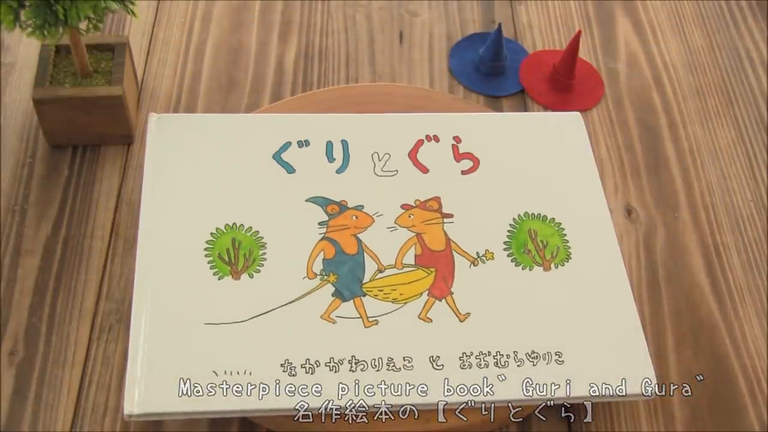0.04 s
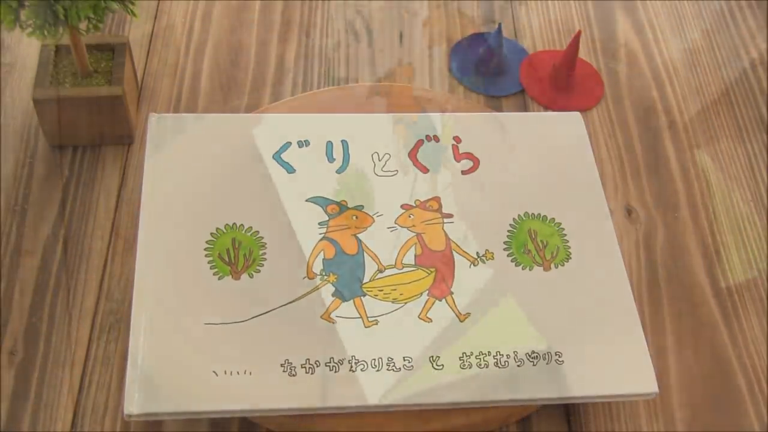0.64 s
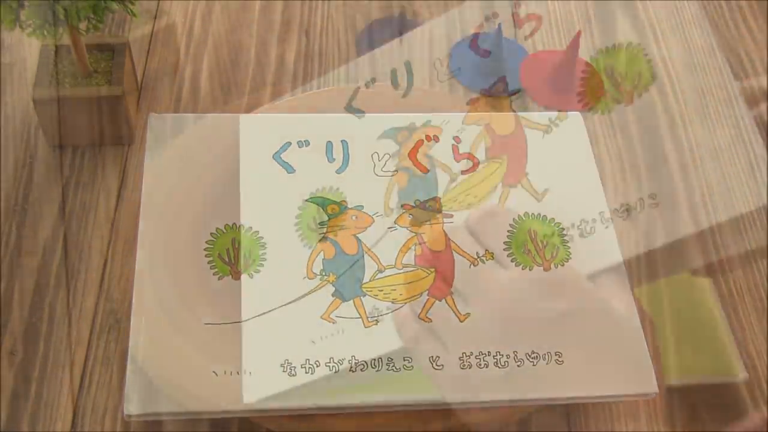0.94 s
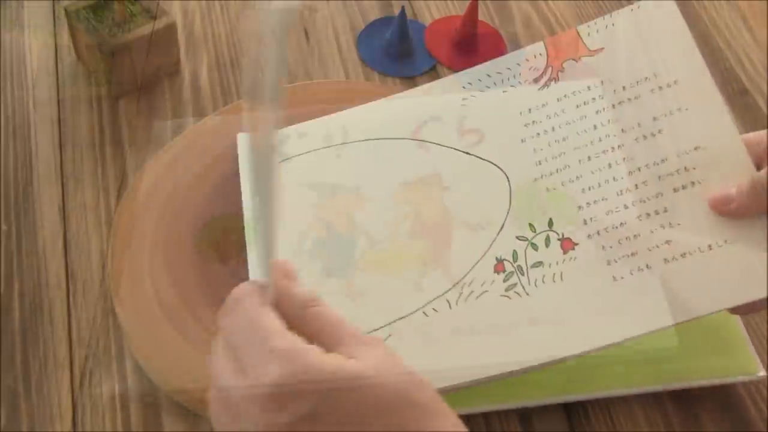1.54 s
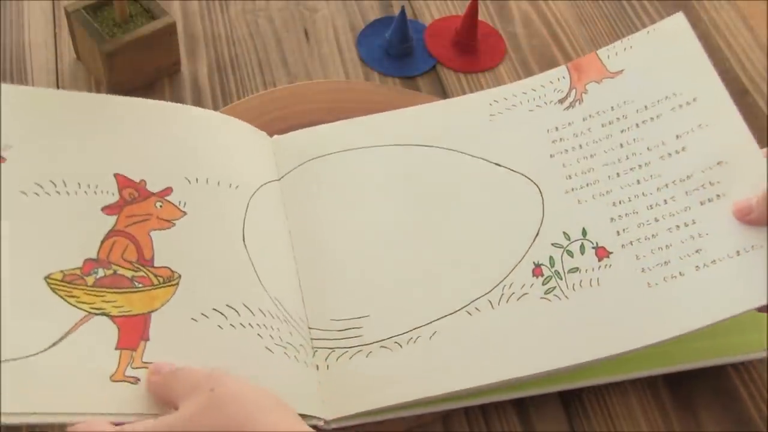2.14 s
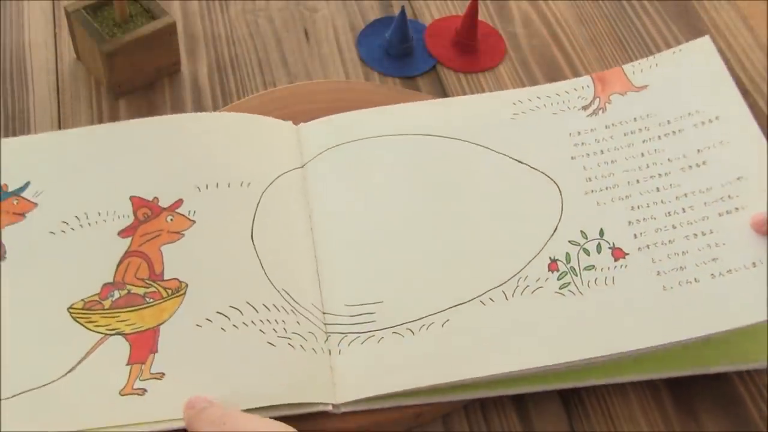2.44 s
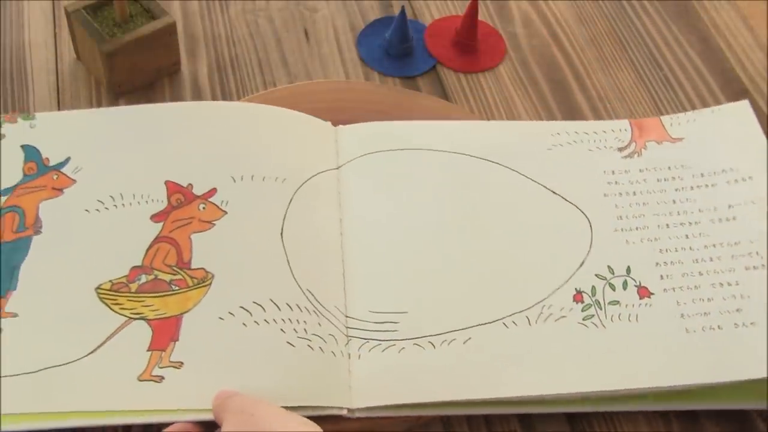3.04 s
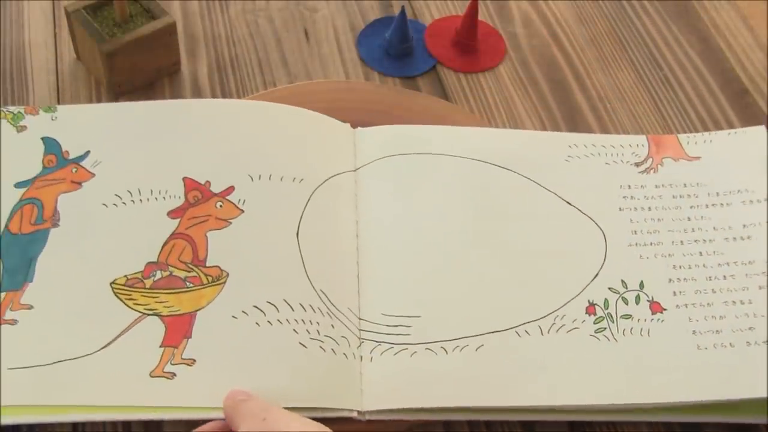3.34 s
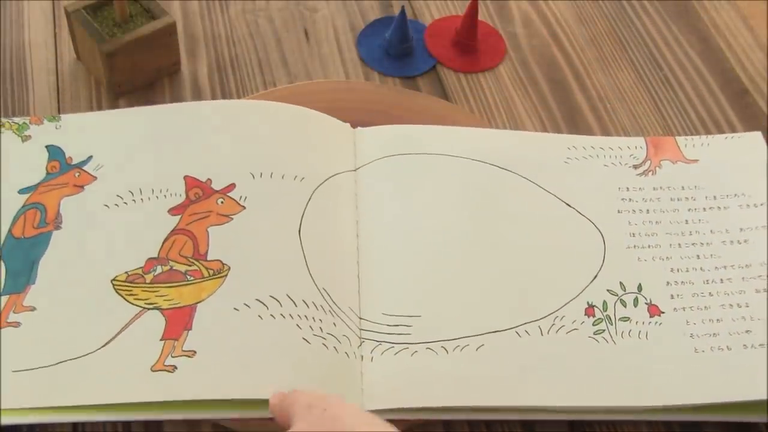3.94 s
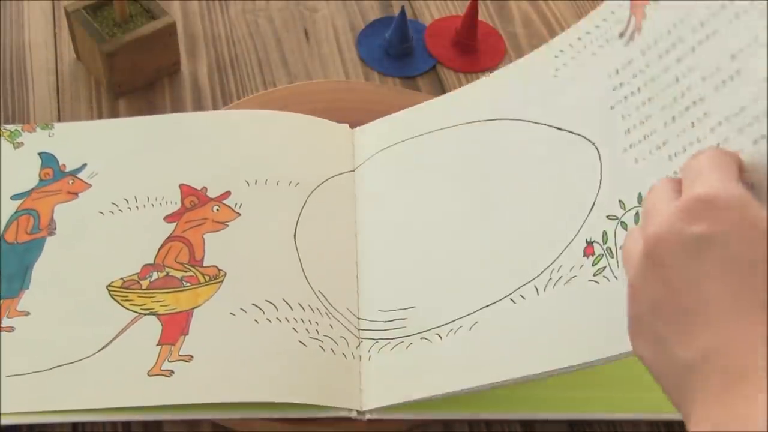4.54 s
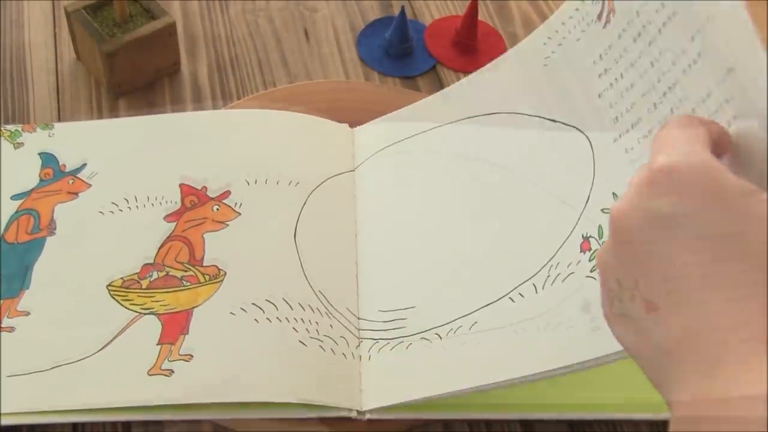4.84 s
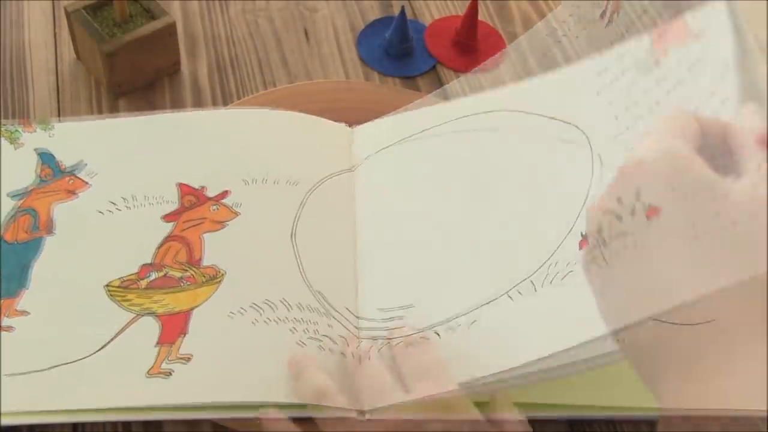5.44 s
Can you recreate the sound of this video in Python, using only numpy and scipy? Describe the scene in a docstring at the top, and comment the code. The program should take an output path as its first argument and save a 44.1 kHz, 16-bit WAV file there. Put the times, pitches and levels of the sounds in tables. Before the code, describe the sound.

In a quiet room, a fingertip rubs briefly on the cover of a large hardcover book. The cover swings open with a soft sliding hiss and small ticks of paper edges, then knocks down on a wooden table and rocks gently. After a short lull, a stiff page is lifted, rustling and buckling with several sharp snaps. The microphone is close.

```python
"""A quiet room, close stereo microphone at a wooden table: a large hardcover picture book is opened.
A fingertip sticks and slips on the cover, boards and sheets slide with a grainy hiss, paper edges tick.
The cover knocks down, rings briefly and rocks; the pages settle, then the next stiff sheet is lifted
and buckles with sharp snaps. Behind it are a short room tail, still air and a faint mains hum."""
import sys
import numpy as np
from scipy import signal
from scipy.fft import rfft, irfft, next_fast_len
from scipy.io import wavfile
from scipy.ndimage import uniform_filter1d

SR = 44100
rng = np.random.default_rng(int(sys.argv[2]) if len(sys.argv) > 2 else 0)


def generate_wav(sig):
    """Save sig (samples, or channels by samples) to the path in sys.argv[1] as 16-bit PCM at SR."""
    pcm = np.round(np.clip(np.atleast_2d(sig).T, -1, 1) * 32767).astype(np.int16)
    wavfile.write(sys.argv[1], SR, pcm)


N = 246078
TIME = np.arange(N) / SR

# the cover lands and bounces: t/s, level/dB
LANDINGS = [(2.529, -12.5), (2.565, -36), (2.605, -26), (2.6086, -29.5)]
# the stiff sheet buckles: t/s, level/dB, f/Hz of the buckled patch, decay/s
BUCKLES = [(4.391, -37.5, 1540, .002), (4.7956, -22, 2240, 0.00051), (4.7974, -26.5, 970, 0.0036),
           (4.948, -29.5, 2120, 0.0017), (5.106, -28, 1380, 0.0027), (5.2365, -20, 2690, 0.0014),
           (5.243, -22, 2240, 0.0026), (5.3443, -32.5, 1210, 0.0016), (5.348, -26.5, 1630, 0.0065),
           (5.477, -27.5, 2200, .0008), (5.492, -35, 2330, 0.00095), (5.506, -24, 2300, .001),
           (5.551, -23, 1980, .002)]
# clear ticks of paper edges and spine: t/s, level/dB, centre f/Hz, time scale/s
EDGE_TICKS = [(0.342, -30.5, 3400, 0.0024), (0.381, -31.5, 3900, 0.00058), (0.403, -31, 3300, 0.0028),
              (0.418, -27.5, 3670, 0.0016), (0.426, -26, 3500, 0.00049), (.4654, -29, 3700, 0.0027),
              (0.494, -34, 3500, .0036), (.506, -25.5, 3100, 0.0013), (1.8965, -25.5, 4230, 0.002),
              (1.9247, -25, 5170, 0.0013), (1.939, -31.5, 3940, 0.0049), (2.094, -37, 6000, 0.0016),
              (2.289, -35.5, 6600, .0016), (2.3725, -28.5, 6800, .0025), (2.46, -43, 6500, 0.0016),
              (2.484, -31, 6540, .0025), (2.577, -29.5, 2990, .0012), (4.0146, -36, 6100, 0.0018),
              (4.474, -40, 6000, 0.0012), (4.699, -26.5, 6200, 0.00073), (4.818, -27.5, 3970, 0.0013),
              (5.056, -35.5, 4200, 0.00064), (5.218, -31, 7900, 0.0025), (5.2337, -25, 3880, .004)]
# spectrum of sliding paper: f/Hz, level/dB
PAPER_HISS = [(300, -33), (1500, 0.5), (2800, 0), (4200, -2), (6300, -3.5), (9000, -7), (12000, -10.5),
              (16000, -19)]


def cover_knocks(lowest_hz=230):
    """The board's edge meets the table: a short blow and a brief ring, with the bass below lowest_hz taken
    away."""
    # modes of the cover board: f/Hz, level/dB, t60/s, share radiated sideways
    board_modes = [(346, -24.5, 0.17, 0.46), (677, -25, 0.12, 0.23), (990, -10, 0.016, 0.34),
                   (1305, -8.5, 0.032, .05), (1800, -20, 0.015, 1), (2420, -28, 0.017, .1)]
    # spectrum of the blow: f/Hz, level/dB
    blow_colour = [(40, -42), (120, -25), (300, -28), (600, 2), (950, 1), (1400, 2), (2300, -4.5),
                   (3200, -11.5), (4200, -25.5), (8000, -37), (16000, -71)]
    t, blow, out = np.arange(SR // 6) / SR, np.zeros((2, SR // 6)), np.zeros((2, N))
    for hz, db, t60, sideways in board_modes:
        side = sideways * np.cos(2 * np.pi * hz * t) * np.minimum(t * hz, 1)
        blow += amp(db - 60 * t / t60) * (np.sin(2 * np.pi * hz * t) + np.array([side, -side]))
    add(blow, 0, pulse(blow_colour))
    for s, db in LANDINGS:
        add(out, s, amp(db) * blow)
    return signal.lfilter(*signal.butter(2, lowest_hz, "high", fs=SR), out)


def sheet_snaps(pop_db=1, fibres_db=-13, book_hz=965, book_db=-23, book_t60=0.019):
    """The sheet pops into a new curve in a run of releases; its fibres crackle and the book rings."""
    # resonances of the bent sheet: f/Hz, level/dB
    sheet_colour = [(50, -19.5), (220, -1), (700, 1), (970, 2.5), (1150, 6.5), (1400, 4.5), (1800, 0.5),
                    (2350, 4.5), (2950, 9.5), (3600, -8), (5000, 2.5), (12000, -11)]
    t, out = np.arange(SR // 30) / SR, np.zeros((2, N))
    for s, db, hz, decay in BUCKLES:
        patch = [(hz * 0.52, 0), (hz, 5), (hz * 1.35, -1), (hz * 2.4, -12), (hz * 6, -20)]
        pop = pulse([(f, read(sheet_colour, f) + read(patch, f)) for f in np.geomspace(50, 16000, 80)])
        releases = spread(rng.standard_normal((2, len(t)))) * .4 * np.exp(-t / max(decay, 1e-4))
        releases[:, 0] = 1  # the sheet first gives way
        releases /= np.linalg.norm(releases.mean(0))
        add(out, s, amp(db + pop_db) * signal.fftconvolve(releases, pop[None], axes=1))
        add(out, s, amp(db + fibres_db) * crackle(0.0041, hz=3300))
        add(out, s, amp(db + book_db - 60 * t / book_t60) * np.sin(2 * np.pi * book_hz * t))
    return out


def edge_ticks(gain_db=3.5):
    """Edges of paper flick past each other."""
    out = np.zeros((2, N))
    for s, db, hz, scale_s in EDGE_TICKS:
        add(out, s, amp(db + gain_db) * crackle(scale_s, hz))
    return out


def drag_ticks(scatter_db=3, scale_s=0.0022):
    """A dragging sheet catches at uneven moments."""
    # drags: start/s, end/s, ticks per s, level/dB, centre f/Hz
    drags = [(1.931, 2.53, 22, -31.5, 6100), (4.8, 5.58, 17, -36.5, 2500)]
    out = np.zeros((2, N))
    for start, end, per_s, db, hz in drags:
        for k, (when, size) in enumerate(rng.random((20, 2))):
            s = start + (k + when) / per_s
            tick = crackle(scale_s, hz)
            if s < end:
                add(out, s, amp(db + scatter_db * (2 * size - 0.5)) * tick)
    return out


def crackle(scale_s, hz):
    """A dying spray of tiny releases in the paper, a broad hump of treble around hz."""
    t = np.arange(SR // 30) / SR
    spray = spread(rng.standard_normal((2, len(t)))) * np.exp(-(t / max(2.5 * scale_s, 1e-4)) ** 3.1)
    hump = [(60, -20), (hz * 0.23, -8), (hz * .5, -6), (hz * 0.88, -1), (hz * 0.91, 0),
            (hz * 1.85, -9), (hz * 2.65, -21)]
    return signal.fftconvolve(spray / np.linalg.norm(spray.mean(0)), pulse(hump)[None], axes=1)


def sliding():
    """Boards and sheets rub as the hands move them: hiss, hollow brushing and the murmur of bending."""
    # the hands reach, swing the cover over, let the pages settle and lift a sheet:
    # start/s, end/s, rise/s, fade/s, hiss level/dB, brush level/dB, murmur level/dB
    moves = [(-.08, 0.336, 0.069, .04, -64, -64, -57), (0.337, 0.646, 0.054, 0.09, -58, -58, -54),
             (0.568, 1.005, 0.25, 0.081, -54, -52.5, -53.5), (0.975, 1.753, 0.26, 0.44, -57.5, -60, -53.5),
             (1.9, 2.545, 0.042, 0.019, -55, -53.5, -59.5), (2.508, 2.606, 0.025, 0.067, -83, -46, -58),
             (2.826, 3.142, 0.49, 0.14, -62.5, -55, -63.5), (3.39, 4.45, 0.47, 0.089, -69, -70.5, -66.5),
             (4.443, 4.55, 0.05, 0.29, -65, -62.5, -63), (4.651, 4.694, .05, 0.078, -55.5, -50, -54.5),
             (4.748, 4.98, 0.11, 0.15, -58, -53, -57), (5.025, 5.6, 0.026, .05, -58.5, -59, -55),
             (5.438, 5.6, .06, .05, -56.5, -49, -58)]
    # spectrum of the brushing: f/Hz, level/dB
    brush_colour = [(200, -25), (450, -1.5), (900, -3.5), (1200, 1), (1550, -0.5), (2100, -6.5),
                    (2800, -5.5), (4000, -13), (9000, -41)]
    # spectrum of bending sheets: f/Hz, level/dB
    flex_colour = [(25, -31), (50, -12.5), (110, -4), (210, 3), (310, 2), (520, -0.5), (900, -5.5),
                   (2000, -19.5), (6000, -29)]
    *_, hiss_db, brush_db, murmur_db = np.transpose(moves)
    hiss = friction(PAPER_HISS, grains_per_s=900, grain_db=0.5, smooth=1.0, flutter_db=-0.2)
    brush = friction(brush_colour, grains_per_s=970, grain_db=1.5, smooth=0.91, flutter_db=0.43)
    murmur = friction(flex_colour, grains_per_s=400, grain_db=0.0, smooth=0.86, flutter_db=0.26)
    return (hiss * effort(moves, hiss_db + 1.48)
            + brush * effort(moves, brush_db - 2.0)
            + murmur * effort(moves, murmur_db - 1.3))


def friction(colour, grains_per_s, grain_db, smooth, flutter_db):
    """Countless fibres catch and let go under a slightly unsteady stroke."""
    catches = rng.random((2, N)) < grains_per_s / SR
    signs = rng.choice([-1, 1], (2, N))
    sizes = amp(grain_db * np.minimum(rng.exponential(1, (2, N)), 4))
    drive = unit(catches * signs * sizes) + smooth * rng.standard_normal((2, N))
    flutter = noise(N, [(3, -15), (20, 0), (80, -2), (250, -25), (900, -80)])
    return spread(unit(coloured(drive, colour))) * amp(flutter_db * flutter)


def effort(moves, levels_db):
    """Gain of a rubbing sound: each movement swells, holds and dies away."""
    power = np.zeros(N)
    for (start, end, rise, fade, *_), db in zip(moves, levels_db):
        swell = np.sin(np.pi / 2 * np.clip((TIME - start) / rise, 0, 1))
        power += (amp(db) * swell * np.exp(-np.maximum(TIME - end, 0) / fade)) ** 2
    return np.sqrt(power)


def finger_judder(jitter=0.3, gain_db=-.5):
    """Skin sticks and slips unevenly, drumming on the cover."""
    # the fingertip's run: t/s, level/dB, slips per s
    run = [(.339, -47, 287), (.344, -44, 250), (.357, -33.5, 433), (.372, -37.5, 346), (.39, -39.5, 270),
           (.41, -46.5, 300), (.44, -64, 175)]
    # spectrum of one slip: f/Hz, level/dB
    slip_colour = [(60, -28), (150, 1), (260, 8), (450, 3.5), (700, 0.5), (1000, -2.5), (1400, -6),
                   (2200, -31), (8000, -54)]
    times, levels_db, rates = np.transpose(run)
    rate = np.interp(TIME, times, rates) * np.exp(jitter * wander(N, size=120))
    slips = np.diff(np.floor(np.cumsum(rate) / SR), prepend=0)
    drive = unit(slips - slips.mean()) + .55 * rng.standard_normal(N)
    drumming = unit(signal.oaconvolve(drive, pulse(slip_colour))[:N])
    touching = (TIME > times[0]) & (TIME < times[-1])
    return drumming * amp(np.interp(TIME, times, levels_db) + gain_db) * touching


def soft_bumps(push_cycles=0.57, gain_db=-1, shudder_db=-8, shudder_cycles=4.3):
    """The book flops and rocks; each landing pushes low air and leaves the boards shuddering."""
    # dull flops of the book: t/s, level/dB, f/Hz
    flops = [(1.826, -41.5, 230), (2.574, -37.5, 193), (2.585, -42, 79), (2.713, -43, 81.5),
             (2.807, -45, 109), (2.838, -45, 93), (4.334, -59, 80)]
    shoves = [(s + 0.0107, -42.5, 118) for s, _ in LANDINGS]  # the landing cover shoves the book
    swings = [(2.886 + k * .048, -50 - k * 2.5, 90) for k in range(4)]  # it rocks to rest
    t, out = np.arange(SR // 4) / SR, np.zeros((2, N))
    for s, db, hz in flops + shoves + swings:
        age = t * hz / push_cycles
        push = (age * np.exp(1 - age)) ** 2 * np.sin(2 * np.pi * hz * t)
        hump = [(hz * 0.27, -24), (hz * 0.83, 0), (hz * 1.34, -2), (hz * 5.4, -35), (hz * 20, -90)]
        shudder = noise((2, len(t)), hump) * np.minimum(age, 1) * np.exp(-t * hz / shudder_cycles)
        add(out, s, amp(db + gain_db) * (push + amp(shudder_db) * shudder))
    return out


def scrapes(grain=0.37, fade_ratio=1.17):
    """Skin or board strokes the paper: a gritty swell in one broad resonance of the board."""
    # short strokes: t/s at the loudest, level/dB, centre f/Hz, swell/s
    strokes = [(.085, -62, 6000, .02), (.955, -44, 1250, 0.024), (0.98, -39.5, 1700, 0.0019),
               (1.031, -54.5, 1340, .02), (1.525, -50, 1420, 0.037), (1.762, -57, 2900, 0.024),
               (2.22, -52.5, 1690, 0.13), (3.1, -61, 730, 0.053), (4.026, -59, 6500, .012),
               (4.514, -58.5, 500, 0.0095), (4.806, -48, 970, .008), (5.086, -51, 2900, 0.011),
               (5.54, -55, 2580, 0.029)]
    t, out = np.arange(-SR // 4, SR // 4) / SR, np.zeros((2, N))
    for s, db, hz, swell in strokes:
        grit = np.exp(grain * wander(len(t), size=100))
        hump = [(hz * 0.051, -22), (hz * .5, -11), (hz * 1.2, 0), (hz * 0.96, 0),
                (hz * 1.7, -14), (hz * 6, -30)]
        scrape = unit(coloured(rng.standard_normal((2, len(t))) * grit, hump))
        contact = np.exp(-.5 * (t / np.where(t < 0, swell, fade_ratio * swell)) ** 2)
        add(out, s + t[0], amp(db) * spread(scrape) * contact)
    return out


def after_rustle(tick_db=-29, snap_db=-31, fade_s=0.021):
    """Each edge tick or snap leaves the sheet hissing for a moment as it relaxes."""
    t, power = np.arange(SR // 3) / SR, np.zeros(N)
    for events, share_db in ((EDGE_TICKS, tick_db), (BUCKLES, snap_db)):
        for s, db, *_ in events:
            add(power, s, (amp(db + share_db) * np.exp(-t / fade_s)) ** 2)
    return spread(noise((2, N), PAPER_HISS)) * np.sqrt(power)


def reflect(x, strength):
    """The direct sound, and its returns within milliseconds from hard surfaces near the book."""
    # wood and walls nearby: delay/s, left gain, right gain
    echoes = [(.0009, 0.2, .0), (.0013, 0.043, 0.32), (.0021, 0.21, 0.3), (.0043, .13, .13),
              (.0073, 0.21, 0.1)]
    out = x * np.ones((2, 1))
    for delay, left, right in echoes:
        add(out, delay, strength * x * np.array([[left], [right]]))
    return out


def room_tail(x, onset_s=0.0027):
    """Dense reverberation in which each band dies at its own speed."""
    # the room's decay: f/Hz, t60/s
    decay = [(100, 0.86), (400, 0.34), (1300, 0.32), (3000, 0.21), (7000, 0.45), (14000, 0.52)]
    hz, t, bands = signal.stft(spread(rng.standard_normal((2, SR // 2))), SR, nperseg=256)
    tail = signal.istft(bands * amp(-60 * t / read(decay, hz)[:, None]), SR, nperseg=256)[1]
    tail *= np.clip(np.arange(tail.shape[1]) / SR / onset_s - 1, 0, 1)
    return signal.oaconvolve(x, tail / np.linalg.norm(tail.mean(0)), axes=1)[:, :N]


def room_tone(air_db=-63.5, rumble_db=-65, rumble_end_s=0.3):
    """Still air, a faint mains hum, and a low rumble that soon stops."""
    # spectrum of the still air: f/Hz, level/dB
    air_colour = [(15, -49), (25, -23), (86, -2.5), (281, -2), (445, -4.5), (509, -4), (552, -0.5),
                  (895, -8.5), (1620, -11.5), (1800, -11), (4620, -17), (8130, -21), (13900, -25),
                  (15500, -30)]
    # mains hum: f/Hz, level/dB
    mains = [(100, -77), (300, -73.5)]
    air = amp(air_db) * spread(noise((2, N), air_colour))
    hum = sum(amp(db) * np.sqrt(2) * np.sin(2 * np.pi * (hz * TIME + rng.random())) for hz, db in mains)
    rumble = amp(rumble_db) * noise(N, [(30, -32), (60, -13), (80, 4), (110, -7), (300, -50)])
    return air + hum + rumble * np.clip((rumble_end_s - TIME) / 0.025 + 1, 0, 1)


def spread(pair):
    """Left and right of a diffuse sound, from unrelated mid and side signals."""
    # stereo width at the microphone: f/Hz, side minus mid level/dB
    width = [(40, -18), (130, -5.5), (330, -2.5), (550, -2), (1200, -6), (8000, -6.5), (15000, -8)]
    side = coloured(pair[1], width)
    return np.array([pair[0] + side, pair[0] - side])


def amp(db):
    """Decibels to gain."""
    return 10 ** (np.asarray(db) / 20)


def unit(x):
    """Scaled to rms 1."""
    return x / np.sqrt(np.mean(x ** 2) + 1e-20)


def read(points, hz):
    """A curve's value at hz, on a log-frequency axis."""
    f, value = np.transpose(points)
    return np.interp(np.log(hz + 1), np.log(f + 1), value)


def add(mix, s, sound):
    """Lays a sound into the mix at time s."""
    part = mix[..., round(s * SR):][..., :sound.shape[-1]]
    part += sound[..., :part.shape[-1]]


def pulse(colour):
    """The minimum-phase pulse, of peak 1, that has this spectrum."""
    db = np.maximum(read(colour, abs(np.fft.fftfreq(2048, 1 / SR))), -100)
    spectrum = np.exp(np.conj(signal.hilbert(np.log(amp(db)))))
    wave = np.fft.ifft(spectrum).real[:1024]
    return wave / abs(wave).max()


def coloured(x, colour):
    """x filtered by a spectrum of (f/Hz, level/dB) points."""
    count = x.shape[-1]
    size = next_fast_len(count + 2048)
    gain = amp(read(colour, np.fft.rfftfreq(size, 1 / SR)))
    return irfft(rfft(x, size) * gain, size)[..., :count]


def noise(shape, colour):
    """Noise of rms 1 with this spectrum."""
    return unit(coloured(rng.standard_normal(shape), colour))


def wander(count, size):
    """A random curve of rms 1, smoothed over size samples."""
    return unit(uniform_filter1d(rng.standard_normal(count), size=size))


def scene():
    """Cover, paper and hands close to the microphone, with the room behind them."""
    rubbing = reflect(sliding() + after_rustle(), strength=0.19)
    paper = reflect(edge_ticks() + drag_ticks(), strength=0.14) + reflect(sheet_snaps(), strength=0.27)
    cover = reflect(cover_knocks(), strength=1.27)
    thuds = reflect(finger_judder(), strength=0.5) + soft_bumps()
    hands = (rubbing + scrapes() + thuds) * amp([[-.5], [.5]])  # a little to the right
    tail = room_tail(amp(-3.5) * paper + amp(-6.0) * cover + amp(-12.5) * thuds)
    return cover + paper + hands + tail + room_tone()


def record(dry):
    """The recorder's band limit, a steep low-pass at 15.9 kHz."""
    lowpass = signal.firwin(511, 15900, window=("kaiser", 9), fs=SR)
    return signal.oaconvolve(dry, lowpass[None], "same")


dry = scene()
out = record(dry)
generate_wav(out)
```